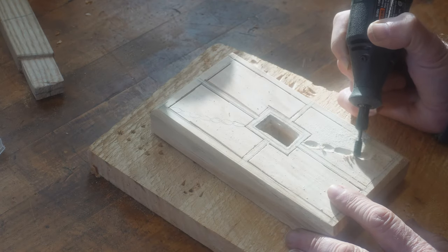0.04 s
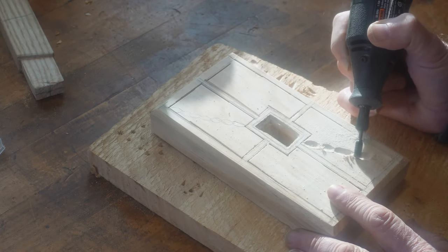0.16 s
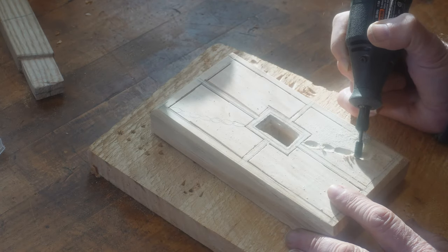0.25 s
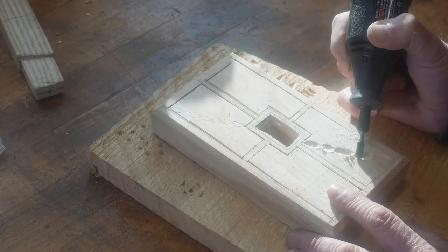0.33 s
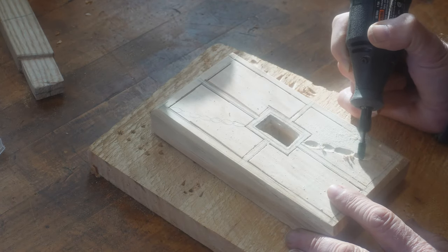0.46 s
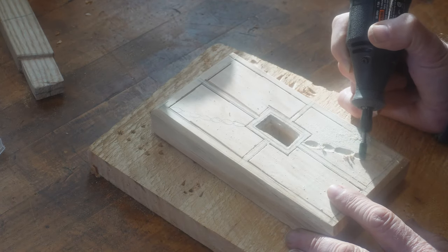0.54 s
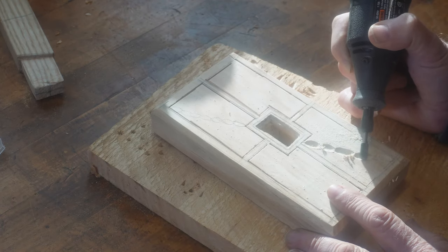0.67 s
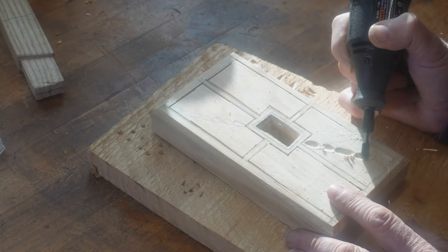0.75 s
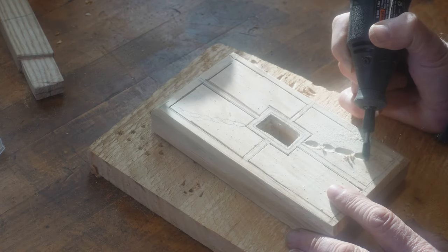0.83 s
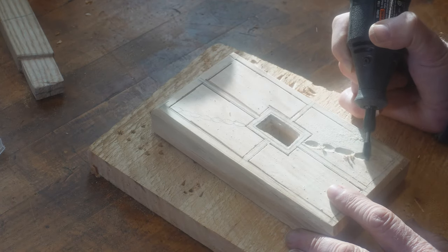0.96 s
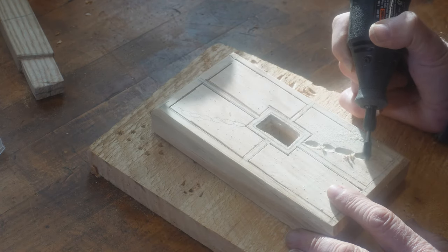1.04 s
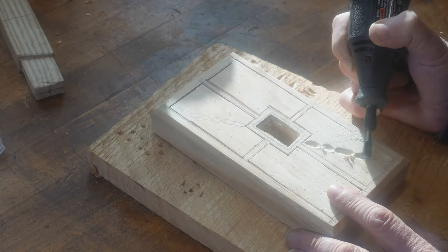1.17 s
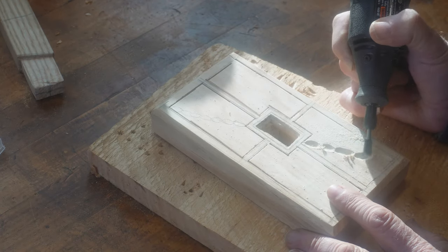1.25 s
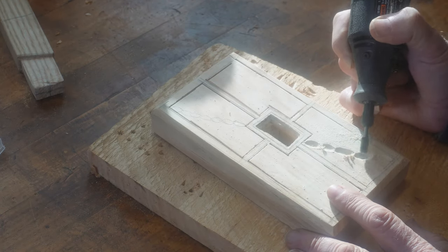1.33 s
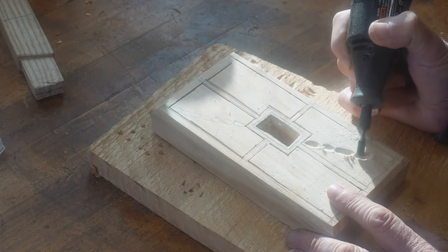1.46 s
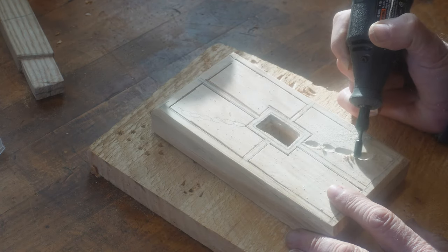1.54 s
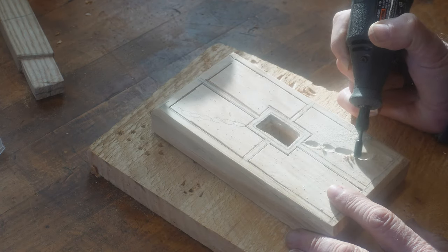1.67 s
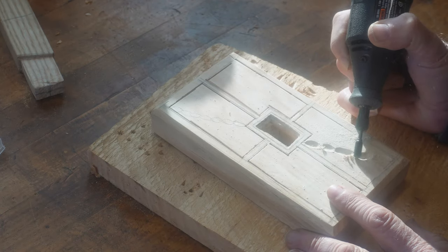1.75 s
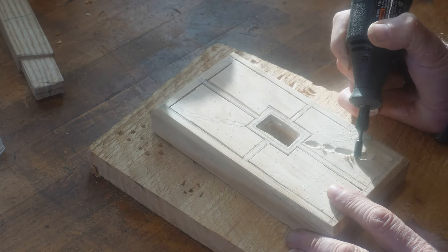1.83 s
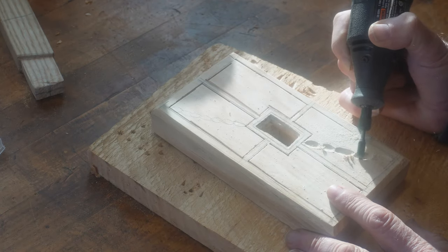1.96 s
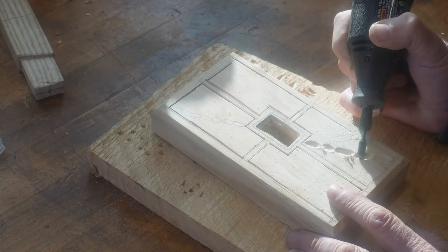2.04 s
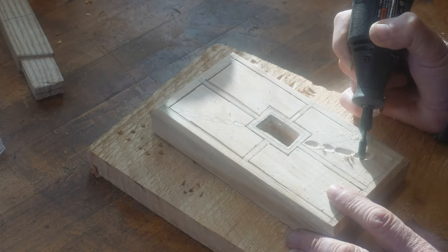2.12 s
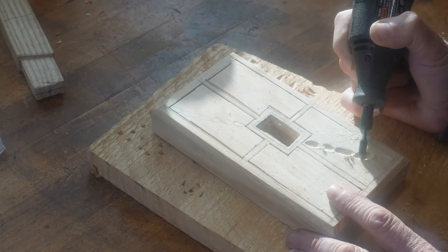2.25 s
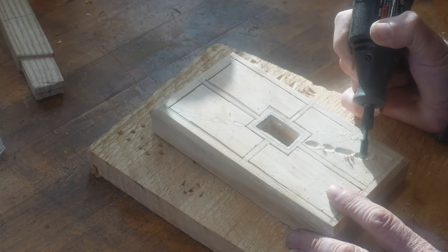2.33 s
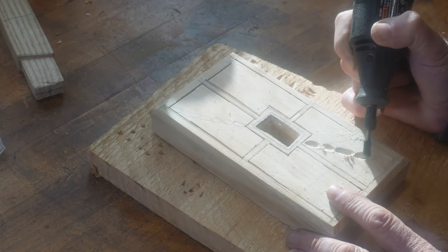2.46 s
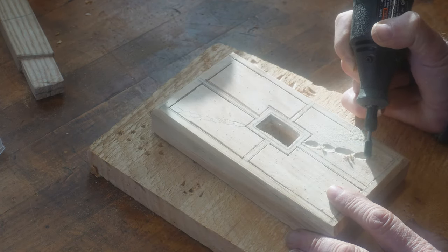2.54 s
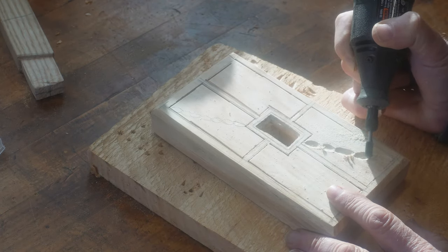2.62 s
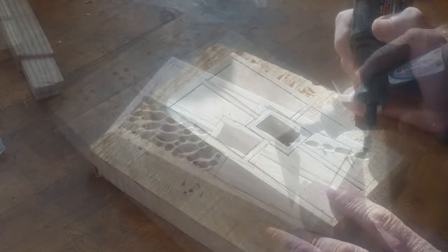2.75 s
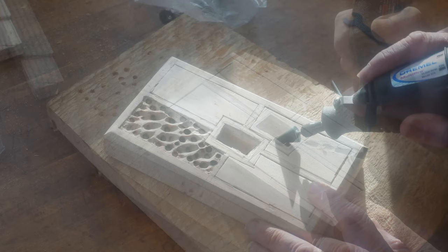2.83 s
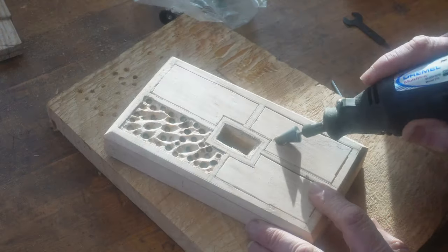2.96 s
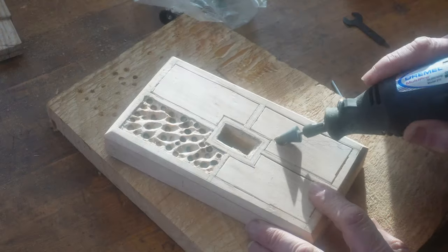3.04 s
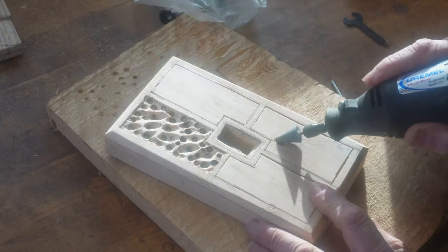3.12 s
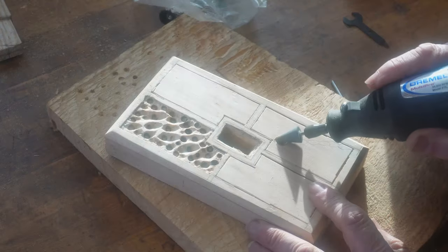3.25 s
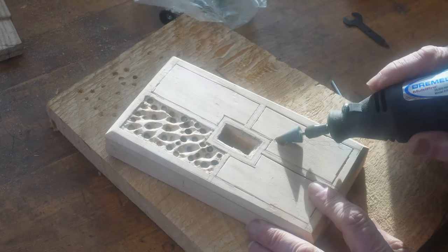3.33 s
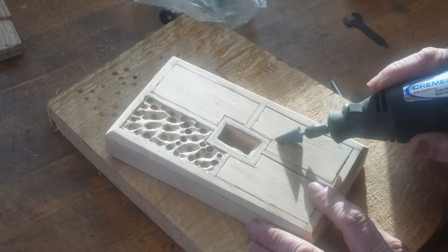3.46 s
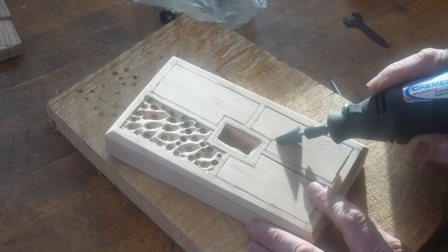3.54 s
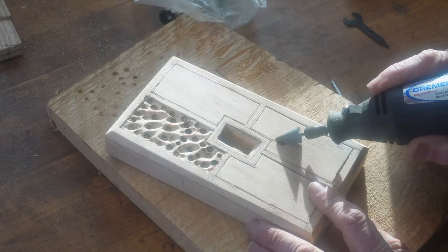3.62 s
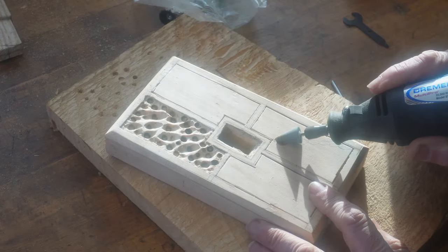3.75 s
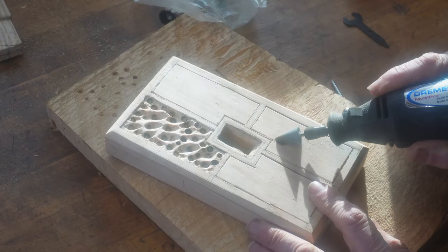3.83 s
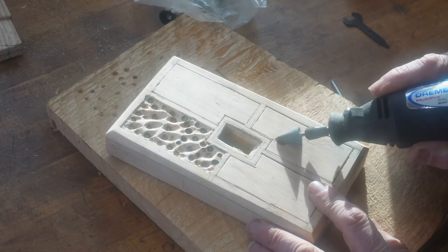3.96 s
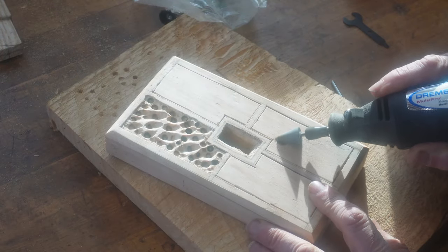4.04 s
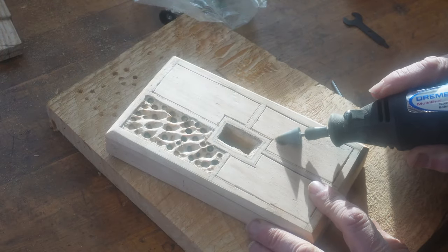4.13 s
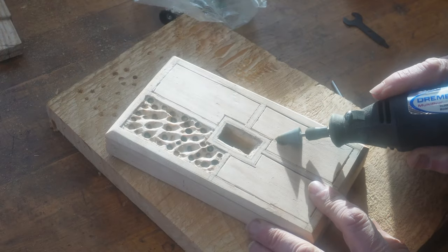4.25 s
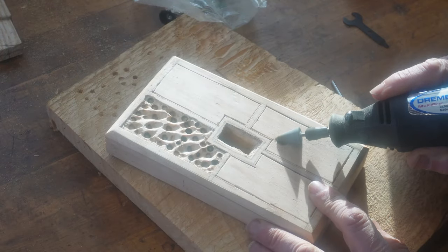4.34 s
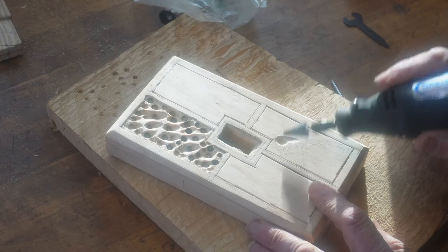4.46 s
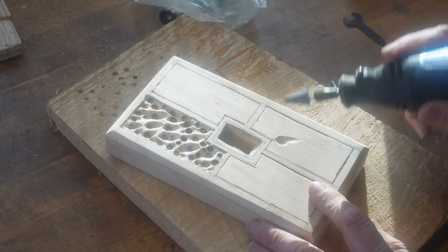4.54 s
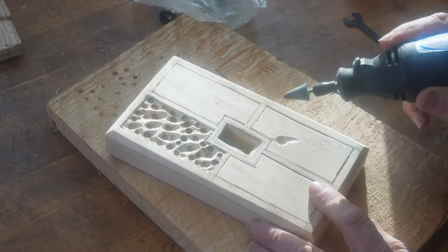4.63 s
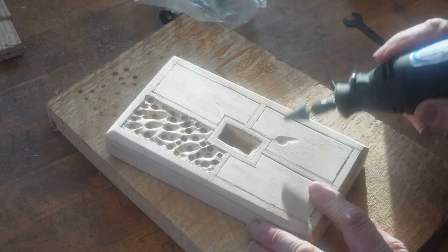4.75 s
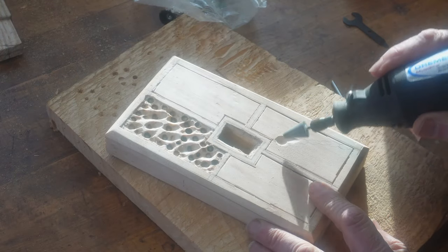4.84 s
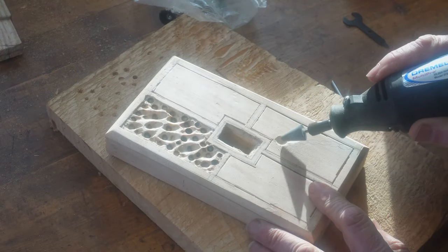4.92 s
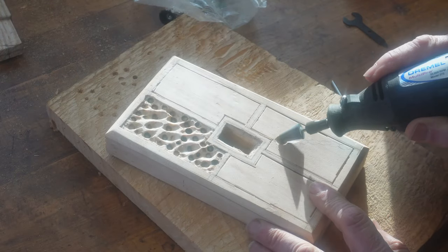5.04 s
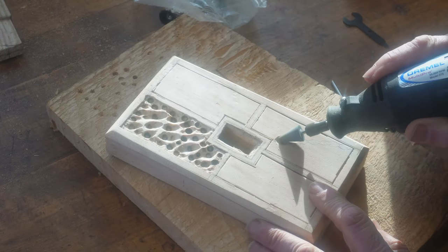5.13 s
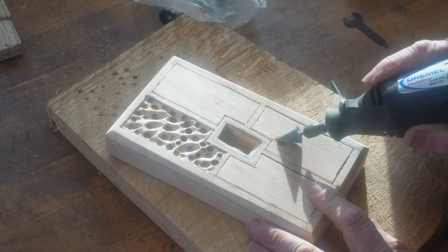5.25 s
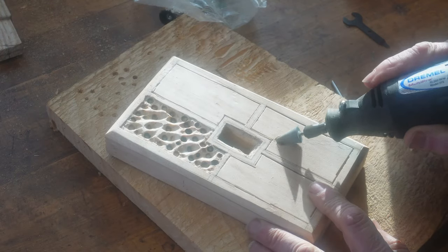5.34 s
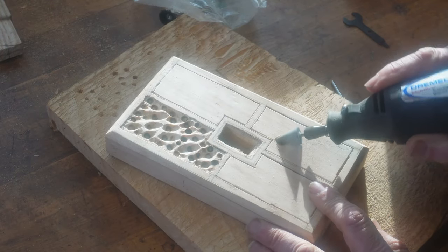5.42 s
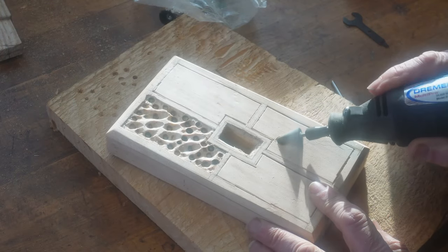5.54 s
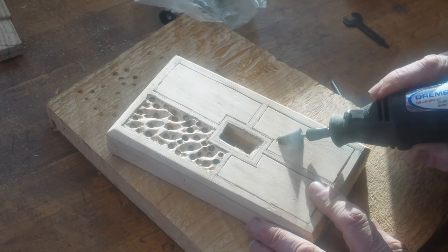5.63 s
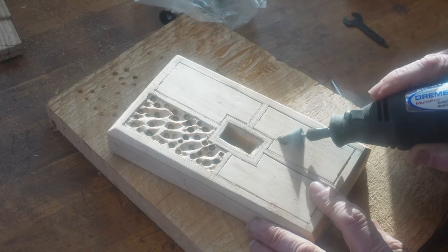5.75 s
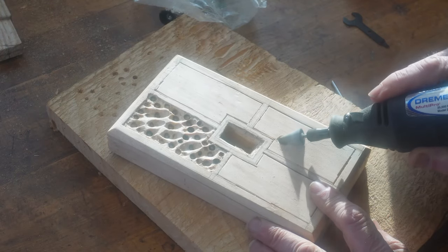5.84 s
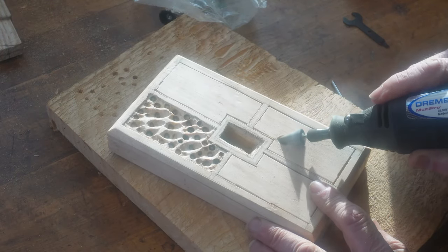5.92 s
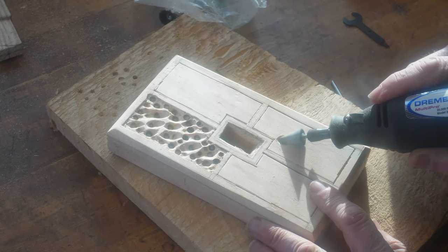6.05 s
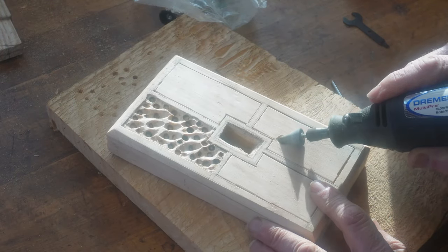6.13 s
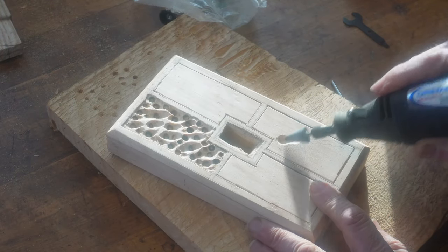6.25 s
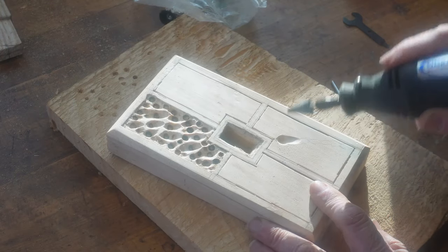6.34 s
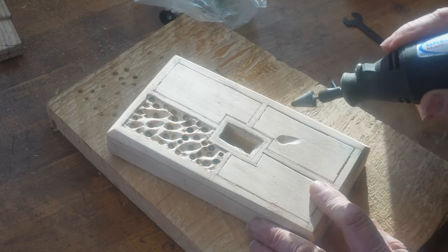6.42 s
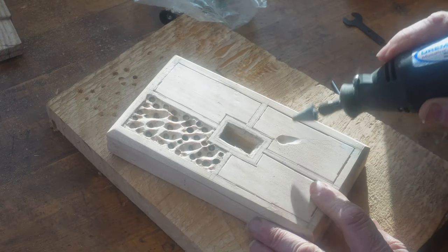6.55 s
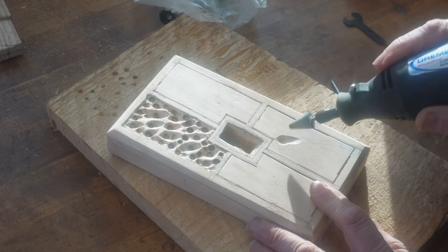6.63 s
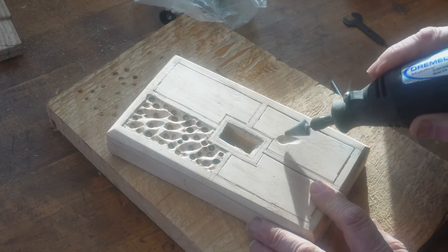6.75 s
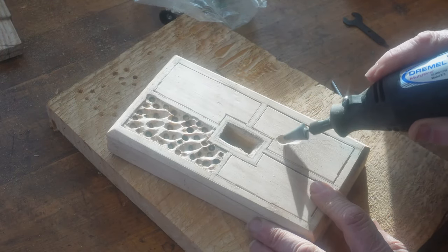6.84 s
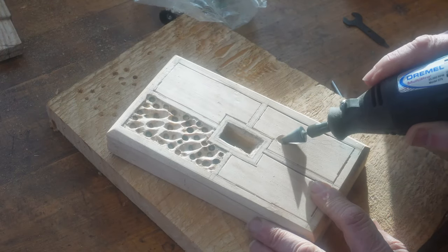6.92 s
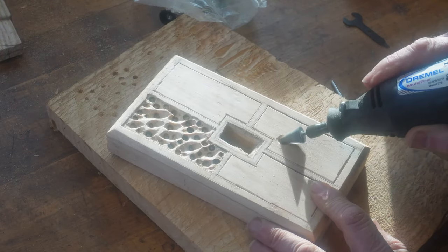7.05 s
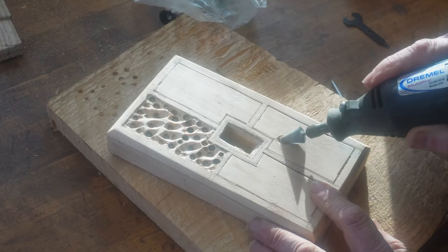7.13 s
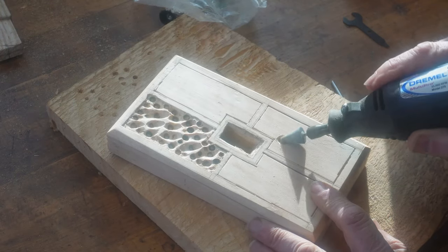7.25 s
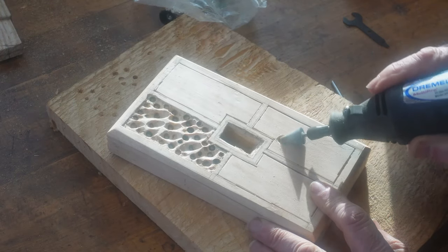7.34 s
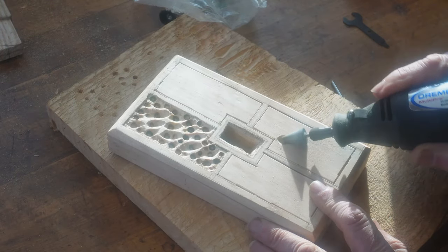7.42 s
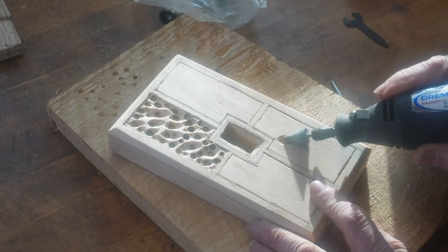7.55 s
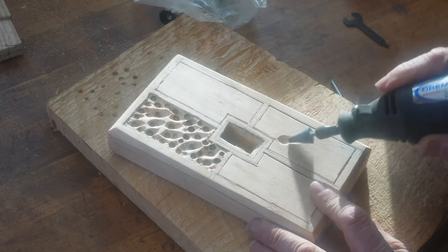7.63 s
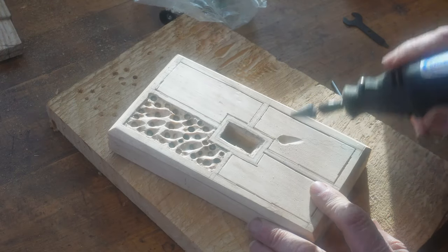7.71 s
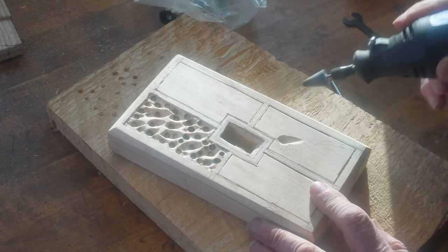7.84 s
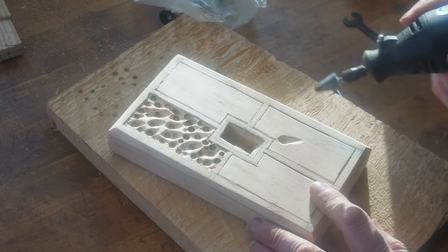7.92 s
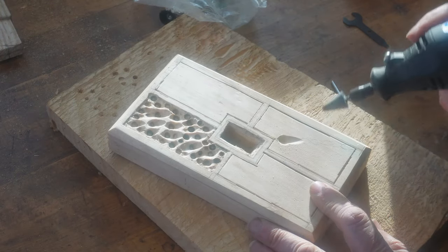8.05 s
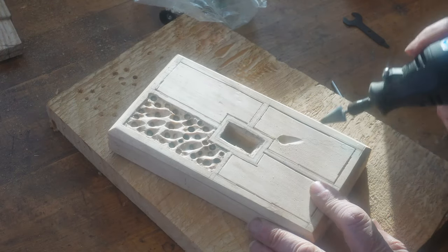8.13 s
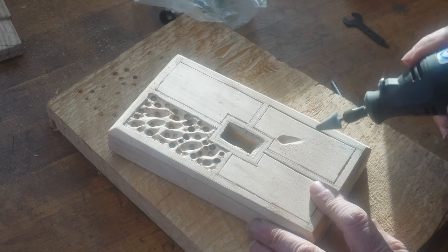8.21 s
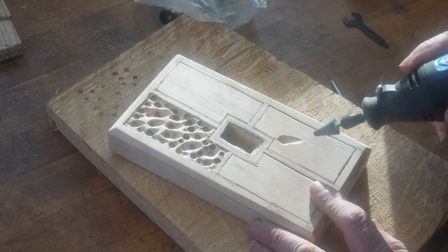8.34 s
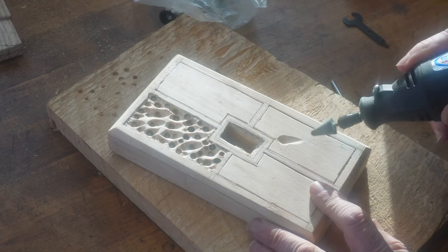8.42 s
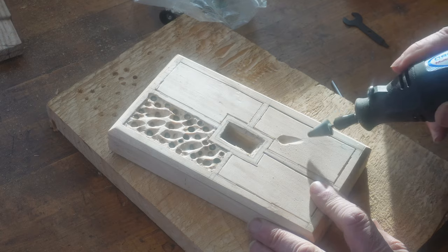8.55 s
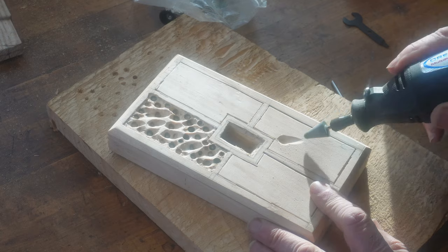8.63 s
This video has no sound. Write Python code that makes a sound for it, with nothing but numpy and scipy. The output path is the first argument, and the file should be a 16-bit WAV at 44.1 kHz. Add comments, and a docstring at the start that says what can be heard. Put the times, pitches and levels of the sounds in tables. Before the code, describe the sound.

A small electric rotary tool carves wood close to a stereo microphone at a workbench. A fine bit buzzes and scrapes at nearly constant high speed for almost three seconds, then blends into a coarse burr. Three presses make it growl and drop in pitch, the middle one deepest, with splinter crackle; each lift lets the motor whine climb back over fan hiss.

```python
"""At a workbench, a handheld rotary tool carves a block of wood, close to a stereo microphone.
A fine bit engraves at nearly steady speed: shaft orders plus a noise scrape once a turn. It dissolves into a
coarse cone burr, pressed in three times; load bogs the motor down, and lifting lets it spin up again.
Burr cuts are pulse trains and noise bites in the block's colours, with splinter crackle. The motor whines
and throbs with the mains; its fan hisses; bench and walls reflect the tool."""
import sys
import numpy as np
from scipy import signal
from scipy.fft import rfft, irfft
from scipy.io import wavfile
from scipy.ndimage import uniform_filter1d, minimum_filter1d

SR = 44100
rng = np.random.default_rng(int(sys.argv[2]) if len(sys.argv) > 2 else 0)


def file_out(sig):
    """Save sig as 16-bit WAV at sys.argv[1]."""
    # one column per channel
    cols = np.atleast_2d(sig).T
    # limit, then scale
    lim = np.clip(cols, -1, 1)
    pcm = np.round(lim * 32767).astype(np.int16)
    wavfile.write(sys.argv[1], SR, pcm)


N = 382788
T = np.arange(N) / SR
MAINS_HALF_WAVE_HZ = 120
FREE_HZ = 448.5  # unloaded burr speed
LOOSE_GRIP = 0.45  # share of a light touch that repeats every turn
MAINS_SWAY_RAD = 0.4
BURR_FADE_S = (2.3, 2.85)  # from, to

# fine bit speed: t/s, f/Hz
FINE_SPEED = [(0.0, 493.5), (0.01, 495.1), (0.87, 490.1), (1.51, 496.3), (1.86, 493.3), (2.02, 489.6),
              (2.43, 489.7), (2.9, 496.0)]
# fine bit buzz: shaft order, relative level/dB
FINE_BUZZ = [(2, -0.5), (6, 1.5)]
# fine bit chatter: shaft order, relative level/dB
FINE_CHATTER = [(3, 0), (4, 0), (7, -14)]
# outline of the upper orders: shaft order, relative level/dB
FINE_OVERTONES = [(7, -3), (8, -3), (12, -6.5), (13, -6), (15, -6.5), (17, -6), (19, -8.5), (21, -9),
                  (24, -12.5), (31, -15)]
# level curves: t/s, buzz level before offset/dB, overtone level before offset/dB
FINE_LEVEL = [(0.0, -42, -44), (0.31, -40, -42), (0.38, -42.5, -43), (0.54, -43, -43), (0.73, -49.5, -50.5),
              (0.97, -46, -45), (1.11, -42.5, -45), (1.56, -41.5, -42.5), (1.85, -40, -41.5),
              (1.91, -43.5, -43.5), (2.1, -44.5, -45.5), (2.34, -43.5, -45.5), (2.43, -46.5, -43.5),
              (2.62, -44, -44.5), (3.03, -45, -47), (3.05, -43, -47)]
# unequal strikes of the skipping bit: shaft order, relative level/dB
SKIP_ORDERS = [(0.75, -14), (1.5, -4), (4.5, 1.5), (6.5, -8), (7.5, -4), (8.5, -4), (9.5, -4), (10.5, -1),
               (11.5, 2.5), (12.5, -7)]
# skipping: t/s, level/dB
SKIP_LEVEL = [(0.0, -58.5), (1.15, -56.5), (1.3, -76), (1.6, -76), (1.9, -49), (2.1, -47.5), (2.38, -49),
              (2.5, -63), (2.9, -68)]
# fifth harmonic: t/s, level/dB
FIFTH_LEVEL = [(0.0, -43), (0.35, -42.5), (0.7, -49), (1.1, -49), (1.35, -45), (1.7, -40.5), (1.9, -39.5),
               (2.02, -50), (2.35, -54), (2.5, -46), (2.9, -47)]
# ringing shank: shaft order, relative level/dB
SHANK_RING = [(9, -4.5), (10, -1.5), (11, -3.5)]
# shank ring: t/s, level/dB
RING_LEVEL = [(0.0, -43), (0.31, -42.5), (0.35, -46.5), (0.96, -48.5), (1.27, -51), (1.28, -45.5),
              (1.54, -40.5), (1.85, -42), (2.08, -52.5), (2.47, -40.5), (2.58, -47.5), (2.9, -45)]
# dry scrape spectrum: f/Hz, relative density/dB per Hz
SCRAPE_COLOUR = [(100, -50), (240, -54), (380, -19), (650, -56), (900, 2.5), (1300, 9), (2000, 8.5),
                 (3300, 1.5), (4300, 7.5), (6500, -12), (9000, 4.5), (12000, -3), (16000, -32)]


def fine_bit():
    """The bit strikes the groove once a turn: buzz, chatter, skips, shank ring, scrape, motor whine."""
    turns = shaft_turns(curves(FINE_SPEED)[0], flutter=0.00025)
    buzz_curve_db, overtone_curve_db = curves(FINE_LEVEL)
    buzz_db, overtone_db = buzz_curve_db + 2.5, overtone_curve_db + 1.5
    bout = contact(start=1.85, attack=0.13, end=2.57)  # stronger chatter
    sway = MAINS_SWAY_RAD

    unbalance = undb(-59) * partials(turns, [(1, 0)], waver_db=-0.5, waver_rate=3.4, throb=0.02, rock=0.02)
    buzz = undb(buzz_db) * partials(turns, FINE_BUZZ, waver_db=1.5, waver_rate=4.86, throb=0.027, rock=0.034)

    chatter_gain = np.hypot(undb(buzz_db - 0.5), undb(-33.7) * bout)
    chatter = chatter_gain * partials(turns, FINE_CHATTER, waver_db=2.0, waver_rate=6.5,
                                      throb=0.092, rock=0.029, sway=sway)
    skip = undb(curves(SKIP_LEVEL)[0]) * partials(turns, SKIP_ORDERS, waver_db=2.0, waver_rate=7,
                                                  throb=0.1, rock=0.02)
    fifth = undb(curves(FIFTH_LEVEL)[0]) * partials(turns, [(5, 0)], waver_db=0.5, waver_rate=7,
                                                    throb=0.16, rock=0.016, sway=sway)

    order, db = np.transpose(FINE_OVERTONES)
    others = (9, 10, 11, 18)  # played by ring and whine
    upper = [(k, np.interp(k, order, db)) for k in range(7, 32) if k not in others]
    overtones = undb(overtone_db) * partials(turns, upper, waver_db=3.5, waver_rate=6.97,
                                             throb=0.16, rock=0.04, sway=sway)
    ring = undb(curves(RING_LEVEL)[0]) * partials(turns, SHANK_RING, waver_db=3.5, waver_rate=5.03,
                                                  throb=0.16, rock=0.03, sway=sway)
    whine = undb(-46) * partials(turns, [(18, 0)], waver_db=2.0, waver_rate=12, throb=0.075, rock=0.013)

    sizes = undb(2.1 * rng.standard_normal(8192))
    scrape = undb(-47.5 + 1 * bout) * colour(bites(turns, sizes, length=0.56), SCRAPE_COLOUR)
    scrape = scrape * (1 - ramp(2.5, 3.0))
    return unbalance + buzz + chatter + skip + fifth + overtones + ring + whine + scrape


# block under the gripping burr: f/Hz, first-cut relative level/dB, later-cut relative level/dB
CUT_COLOUR = [(310, -23, -21), (645, -23, -16.5), (740, -15.5, -16), (841, -8, -2.5), (970, -4.5, 2.5),
              (1186, -5.5, -2), (1325, -4.5, 3.5), (1558, -6, -5), (2010, 2, 6), (2295, 2, 4.5),
              (2450, -11, -8), (2780, -8.5, -13), (3075, 4, 0.5), (3430, 0.5, -8), (3670, -2.5, -5),
              (4300, -1.5, 3.5), (4860.5, -7, -4), (5670, -12.5, -12.5), (6500, -26, -19), (9000, -51, -42)]
# loose rasp: f/Hz, relative density/dB per Hz
RASP_COLOUR = [(40, -66), (200, -40), (330, -24), (620, -24.5), (850, -8), (1450, -6.5), (1700, 2),
               (2100, 1), (2700, -6.5), (3500, -1), (4200, 3.5), (5400, -14), (7400, -14), (8600, -16.5),
               (15000, -29.5)]
# fibres torn by the gripping teeth: f/Hz, relative density/dB per Hz
GRIT_COLOUR = [(300, -47.5), (900, -22), (2100, -5.5), (2750, -14), (3500, -8), (4250, 3), (5200, -10),
               (6200, -6), (6900, -13), (7400, -4), (8200, -20), (15000, -41)]
# splinter crackle: f/Hz, relative density/dB per Hz
SPLINTER_COLOUR = [(500, -38), (3000, 5.5), (6000, 4), (8500, -16), (9700, -3), (11300, -7), (12300, -25),
                   (16000, -35)]


def burr_cut(turns, sag_hz, strength, grip, bright_db, splinters):
    """A loose burr rasps; a gripping one bites once a turn, growling and tearing grit; splinters crackle."""
    pressure, swing_turns = bouncing()
    rasp_sizes = undb(2.5 * rng.standard_normal(8192))
    rasp = colour(pressure * bites(turns, rasp_sizes, length=0.74), RASP_COLOUR)
    grit_sizes = undb(1.4 * rng.standard_normal(8192))
    grit = colour(pressure * bites(turns, grit_sizes, length=0.67), GRIT_COLOUR)

    harmonics = [(k, 0) for k in range(1, 18)]
    between = [(k + 0.5, -18.0) for k in range(1, 15)]  # alternate turns cut unequally
    # grain catches the teeth early or late, more so in a loose grip
    jitter_turns = 0.0025 + 0.025 * (1 - grip) ** 2
    snagged = turns + swing_turns + jitter_turns * walk(260)
    teeth = pressure * partials(snagged, harmonics + between, waver_db=4.5, waver_rate=24,
                                throb=0.072, rock=0.0049, spread=2.5)

    hz, first_db, later_db = np.transpose(CUT_COLOUR)
    first = colour(teeth, np.c_[hz, first_db]) + undb(-14.5) * grit
    later = colour(teeth, np.c_[hz, later_db]) + undb(-7.5) * grit
    growl = np.where(T < 4.9, unit(first), unit(later))
    cut = np.sqrt(grip) * growl + np.sqrt(1 - grip) * rasp

    # bright_db sets the block's high resonances against its low ones
    low = signal.sosfiltfilt(signal.butter(4, 2700, fs=SR, output="sos"), cut)
    cut = unit(low) + undb(bright_db) * unit(cut - low)
    stutter_db = 1.1 * walk(22)  # uneven hand pressure
    sag_db = 0.005 * sag_hz

    snaps_per_s = 1500
    struck = rng.random(N) < snaps_per_s / SR
    snaps = struck * rng.standard_normal(N) * undb(3.1 * rng.standard_normal(N))
    crackle = splinters * undb(4.0 * walk(16)) * colour(snaps, SPLINTER_COLOUR)
    return strength * undb(sag_db + stutter_db) * cut + crackle


# burr on wood: touch t/s, attack/s, lift t/s, low-band level/dB, load at which it grips/Hz,
# best grip/0-1, treble rise with grip/dB, splinter level/dB
BURR_CUTS = [(2.75, 0.56, 4.485, -34.5, 40.3, 0.99, -1, -49), (5.125, 0.01, 5.175, -39.5, 40, 0.4, 0, -70),
             (5.225, 0.024, 5.36, -41.5, 40, 0.5, 10, -70), (5.31, 0.12, 6.295, -32.5, 45, 1, 1.5, -37.5),
             (6.99, 0.0065, 7.09, -45.5, 40, 0.5, 0, -70), (7.06, 0.076, 7.61, -34.5, 34, 0.96, 4.5, -40)]
# bouncing, some rows near a fifth or a half of the shaft speed: start t/s, end t/s, first rate f/Hz, last rate
# f/Hz, depth/dB, # swing of the bites/turns, change of cut strength and grip/dB
BOUNCES = [(3.05, 3.394, 88.34, 84, 4, 0.084, -1.4), (3.417, 3.679, 88, 107.4, 3, 0.063, -2.5),
           (3.696, 3.9, 110, 125, 4, 0.021, -0.9), (4.44, 4.5, 122, 121.4, 3.5, 0.022, 0.5),
           (5.12, 5.17, 60, 60, 4, 0.065, -1.5), (5.229, 5.487, 89.84, 113.8, 4.5, 0.063, -2),
           (6.055, 6.332, 154.5, 157.5, 4, 0.082, -5.5), (7.106, 7.193, 99.6, 100.2, 7.5, 0.051, 0),
           (7.208, 7.288, 99.7, 108.7, 3, 0.03, 2), (7.602, 7.71, 118.2, 116, 1, 0.024, 1)]


def burr_contact(load_hz):
    """Load makes the teeth grip: returns cut strength, grip (share repeating every turn), treble, splinters."""
    strength, grip, bright_db, splinters = undb(-60.5), LOOSE_GRIP, -1, 0  # spinning in air
    for touch, attack, lift, db, grip_load, best_grip, treble_db, splinter_db in BURR_CUTS:
        pressed = contact(touch, attack, lift)
        hold = pressed * (1 - np.exp(-(load_hz / grip_load) ** 2))
        strength = np.hypot(strength, undb(db) * pressed)
        grip = grip + (best_grip - LOOSE_GRIP) * hold
        bright_db = bright_db + treble_db * hold ** 2
        splinters = splinters + undb(splinter_db) * hold
    for start, end, *_, change_db in BOUNCES:
        kept = undb(change_db * contact(start, 0.012, end))
        strength, grip = strength * kept, grip * kept
    return strength, np.clip(grip, 0, 1), bright_db, splinters


def bouncing():
    """Bounces modulate pressure on the wood and make bites early or late; returns pressure and turns."""
    pressure, swing = 1, 0
    stumble_cycles = 0.035 * walk(40)
    for start, end, first_hz, last_hz, depth_db, swing_turns, _ in BOUNCES:
        rate_hz = np.interp(T, [start, end], [first_hz, last_hz])
        angle = 2 * np.pi * (np.cumsum(rate_hz) / SR + stumble_cycles)
        active = contact(start, 0.011, end)
        pressure = pressure + active * (unit(undb(depth_db * np.cos(angle))) - 1)
        swing = swing + active * swing_turns * np.sin(angle)
    return pressure, swing


# load on the burr, one curve per cut: t/s, speed it would cost if held f/Hz
BURR_LOADS = [
    [(2.61, 0), (3.14, 25), (3.67, 37), (3.81, 53), (4.47, 104), (4.55, 0)],
    [(5.25, 0), (5.404, 34), (5.576, 136), (5.752, 186), (5.876, 127), (6.11, 183), (6.32, 0)],
    [(7.0, 0), (7.21, 27), (7.315, 117), (7.65, 147), (7.715, 0)],
]


def pressing_load():
    """Load from the hand's three presses, as the speed it would cost in Hz."""
    return sum(curves(cut)[0] for cut in BURR_LOADS)


def lost_speed(load_hz):
    """Hz below free speed: rotor inertia makes it follow the load late, down and up."""
    inertia_s = 0.298
    keep = np.exp(-1 / (inertia_s * SR))
    return signal.lfilter([1 - keep], [1, -keep], load_hz)


# shaft and housing hum: shaft order, relative level/dB
HUM_ORDERS = [(2, -13.5), (3, -1), (4, -3), (6, -1.5), (7, 0.5), (9, 0), (10, -11), (14, -11), (15, -14),
              (16, -1.5), (31, -16), (32, -15)]
# commutator whine: shaft order, relative level/dB
WHINE_ORDERS = [(18, -2), (36, -21)]
# howl: shaft order, relative level/dB
HOWL_ORDERS = [(8, 3), (16, -28), (24, -24)]
# housing resonance passed by the howl: f/Hz, level before load damping/dB
HOWL_RESONANCE = [(2500, -66), (2780, -50), (3020, -43), (3330, -50.5), (3480, -49.5), (3570, -58)]
# unbalance tone against shaft speed: f/Hz, level before load waver/dB
UNBALANCE = [(310, -56), (335, -62), (355, -66), (390, -69.5), (420, -64.5), (445, -61.5)]


def burr_motor(turns, sag_hz, load_hz):
    """Speed sets unbalance, commutator whine and housing-resonant howl; load damps whine and howl."""
    shaft_hz = FREE_HZ - sag_hz
    # brief swell of whine and third harmonic
    swell_s, half_width_s = 8.45, 0.17
    swell = np.exp(-((T - swell_s) / half_width_s) ** 2)
    third = undb(-50.5) * swell * partials(turns, [(3, 0)], waver_db=3.0, waver_rate=15, throb=0.1, rock=0.02)

    unbalance_db = np.interp(shaft_hz, *np.transpose(UNBALANCE))
    load_waver_db = 6 * np.tanh(load_hz / 100) * np.minimum(walk(16), 0.7)
    unbalance = undb(unbalance_db + load_waver_db) * partials(turns, [(1, 0)], waver_db=3.5, waver_rate=9,
                                                              throb=0.012, rock=0.012)
    hum = undb(-52.5) * partials(turns, HUM_ORDERS, waver_db=6.5, waver_rate=13, throb=0.11, rock=0.017)

    # whine drops fast with the first loss of speed
    whine_db = -40 - 1.5 * np.sqrt(np.maximum(sag_hz, 4)) - 0.0638 * load_hz + 5.5 * swell
    whine = undb(whine_db) * partials(turns, WHINE_ORDERS, waver_db=4.0, waver_rate=45,
                                      throb=0.043, rock=0.013)

    howl_hz = HOWL_ORDERS[0][0] * shaft_hz
    howl_db = np.interp(howl_hz, *np.transpose(HOWL_RESONANCE)) - 0.0736 * load_hz
    howl = undb(howl_db) * partials(turns, HOWL_ORDERS, waver_db=-3.0, waver_rate=50, throb=1.0, rock=0.054)
    return unbalance + hum + third + whine + howl


# fan hiss: f/Hz, relative density/dB per Hz
AIR_COLOUR = [(40, -68), (150, -44.5), (300, -32), (600, -17.5), (850, -12), (1300, 1.5), (2400, 1),
              (3400, 1), (4200, -2), (5500, -1.5), (7600, 0), (9500, -5.5), (13500, -7.5), (16000, -11)]


def cooling_air(sag_hz, grip):
    """Fan hiss sinks with lost speed and grip; treble differs at the two microphones."""
    fine_db = 1.5 * (1 - ramp(*BURR_FADE_S))  # faster fine bit
    air_db = -45 + fine_db - 0.0163 * sag_hz - 6 * (grip - LOOSE_GRIP)
    mid, side = (colour(rng.standard_normal(N), AIR_COLOUR) for _ in range(2))
    side = signal.sosfilt(signal.butter(1, 9000, "high", fs=SR, output="sos"), side)
    sparks = 1 + 0.067 * np.cos(2 * np.pi * MAINS_HALF_WAVE_HZ * T)  # brushes fizz with the mains
    gain = undb(air_db + 0.5 * walk(24)) * sparks
    return gain * (mid + 0.79 * side * np.array([[1], [-1]]))


def workshop(x, wet_db, t60_s):
    """Short reflections off bench and walls: decaying noise tails, different in each ear."""
    t = T[:SR // 3]
    tails = rng.standard_normal((2, len(t))) * np.exp(-np.log(1000) * t / t60_s) * (t > 0.002)
    tails = signal.sosfilt(signal.butter(1, 900, "high", fs=SR, output="sos"), tails)
    tails /= np.sqrt(np.sum(tails ** 2, axis=1, keepdims=True))
    return x + undb(wet_db) * signal.fftconvolve(x[None], tails, axes=1)[:, :N]


def shaft_turns(hz, flutter):
    """Shaft angle in turns; the speed trembles slightly."""
    return np.cumsum(hz * (1 + flutter * walk(45))) / SR


def partials(turns, orders, waver_db, waver_rate, throb, rock, spread=np.pi, sway=0):
    """Wavering shaft orders, rms 1; mains half-waves swell them, rock the rotor and sway phases (radians)."""
    mains = 2 * np.pi * MAINS_HALF_WAVE_HZ * T
    angle = 2 * np.pi * turns - rock * np.sin(mains)
    out = 0
    for order, db in orders:
        # a small phase spread gathers the orders into one pulse a turn
        phase = order * angle + spread * rng.uniform(-1, 1)
        if sway:
            phase = phase + sway * np.sin(mains + 2 * np.pi * rng.random())
        level_db = db + waver_db * np.minimum(walk(waver_rate), 1)
        out = out + undb(level_db) * np.sin(phase)
    return unit(out * (1 + throb * np.cos(mains)))


def bites(turns, sizes, length):
    """Noise flares once a turn, each with its own size, decaying by 1/e in `length` turns."""
    return rng.standard_normal(N) * sizes[turns.astype(int)] * np.exp(-(turns % 1) / length)


def contact(start, attack, end):
    """Attack, hold and exponential release of a contact (times in s)."""
    release_tau_s = 0.052
    return ramp(start, start + attack) * np.exp(-np.maximum(T - end, 0) / release_tau_s)


def ramp(start, end):
    """Rises from 0 to 1 between two times in s."""
    return np.clip((T - start) / max(end - start, 1 / SR), 0, 1)


def curves(table):
    """Columns of a table as smooth signals in time."""
    s, *columns = np.transpose(table)
    return [uniform_filter1d(np.interp(T, s, c), size=900, mode="nearest") for c in columns]


def walk(rate):
    """Random wander, about `rate` turns a second, spread near 1."""
    steps = rng.standard_normal(2048)
    return 1.2 * np.interp(T * rate, np.arange(len(steps)), steps)


def colour(x, points):
    """Causal minimum-phase filter with the given (f/Hz, level/dB) outline; output at rms 1."""
    hz, db = np.transpose(points)
    size = 4096
    grid = np.maximum(np.fft.rfftfreq(size, 1 / SR), 1)
    outline_db = np.interp(np.log(grid), np.log(hz), db)
    cepstrum = irfft(np.log(undb(outline_db)))
    cepstrum[1:size // 2] *= 2  # fold to minimum phase
    cepstrum[size // 2 + 1:] = 0
    impulse = irfft(np.exp(rfft(cepstrum)))
    return unit(signal.fftconvolve(x, impulse)[:N])


def undb(db):
    """Decibels to gain."""
    return 10 ** (np.asarray(db) / 20)


def unit(x):
    """Scale to rms 1."""
    return x / np.sqrt(np.mean(x ** 2))


def limiter(x, ceiling):
    """Turns both channels down very briefly around each peak above the ceiling."""
    peak = -minimum_filter1d(-np.max(np.abs(x), axis=0), size=133)
    gain = ceiling / np.maximum(peak, ceiling)
    return x * uniform_filter1d(uniform_filter1d(gain, size=110), size=66)


def scene():
    """Fine bit dissolves into coarse burr, whose load sets speed, grip and hiss; tool slightly right."""
    load_hz = pressing_load()
    sag_hz = lost_speed(load_hz)
    turns = shaft_turns(FREE_HZ - sag_hz, flutter=0.001204)
    strength, grip, bright_db, splinters = burr_contact(load_hz)
    cut = burr_cut(turns, sag_hz, strength, grip, bright_db, splinters)
    burr = cut + burr_motor(turns, sag_hz, load_hz)
    tool = (1 - ramp(2.95, 3.35)) * fine_bit() + ramp(*BURR_FADE_S) ** 2 * burr
    pan_db = 0.56
    sound = workshop(tool, wet_db=-10.5, t60_s=0.44) + cooling_air(sag_hz, grip)
    return sound * undb([[-pan_db], [pan_db]])


def record(dry):
    """Holds the peaks down and cuts the top steeply."""
    held = limiter(dry, ceiling=0.079)
    return signal.sosfilt(signal.ellip(12, 0.1, 90, 15750, fs=SR, output="sos"), held)


dry = scene()
out = record(dry)
file_out(out)
```